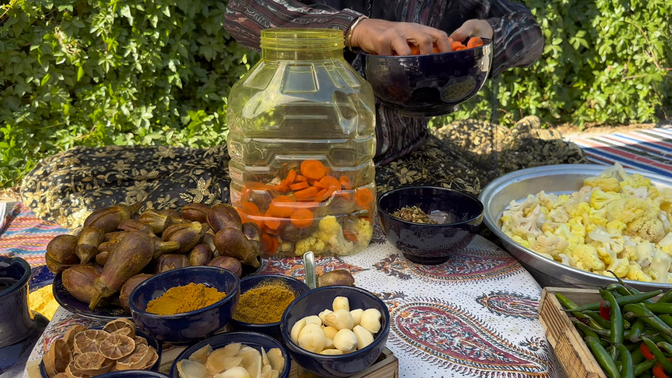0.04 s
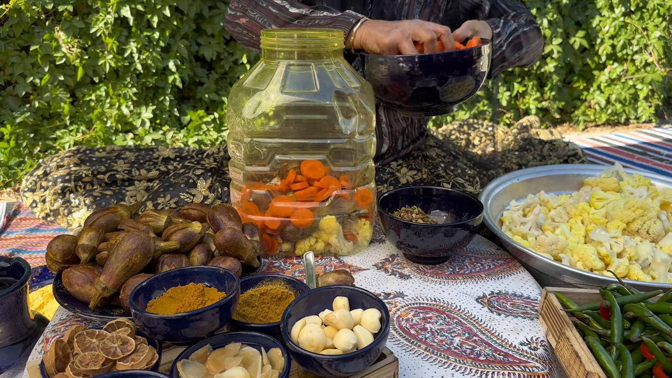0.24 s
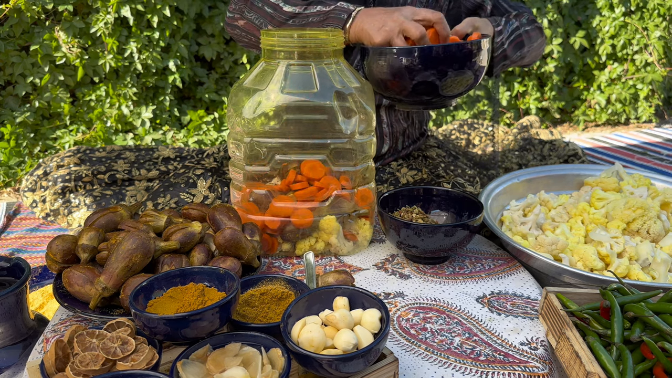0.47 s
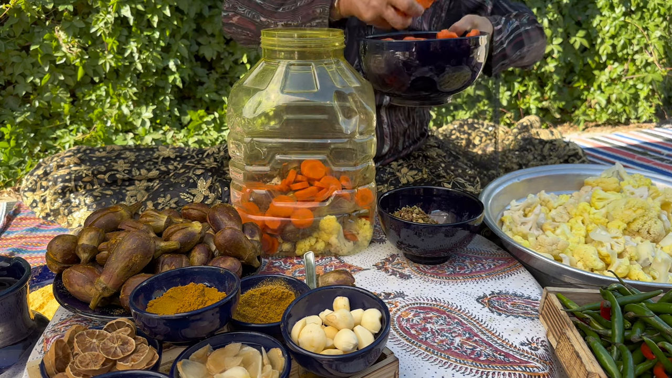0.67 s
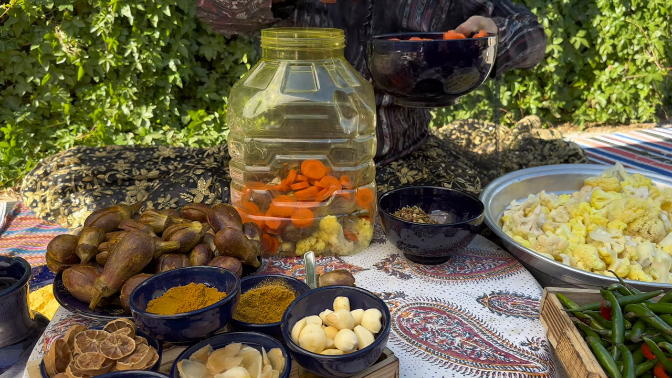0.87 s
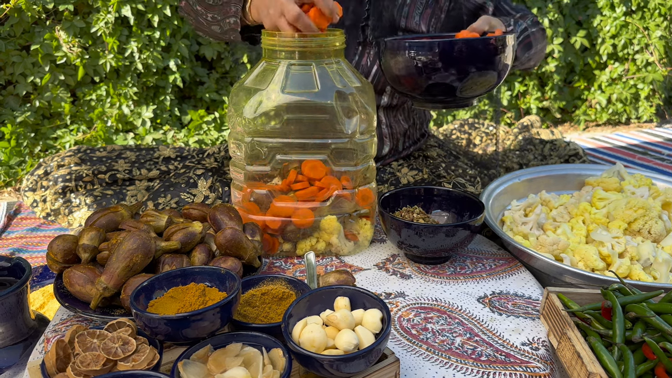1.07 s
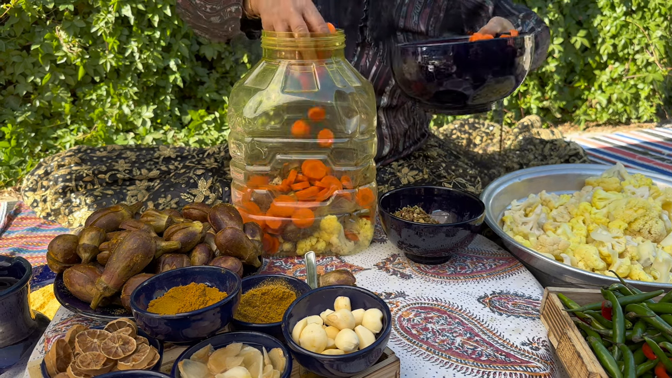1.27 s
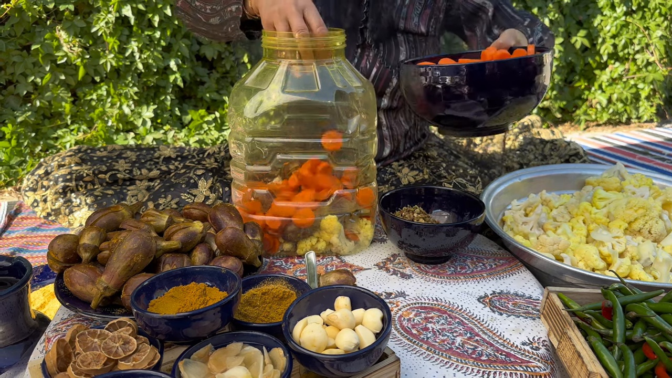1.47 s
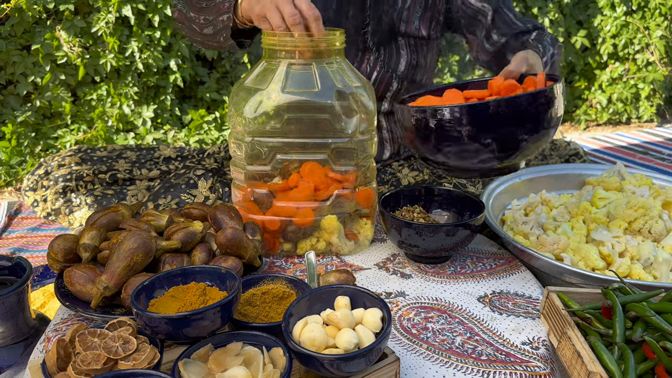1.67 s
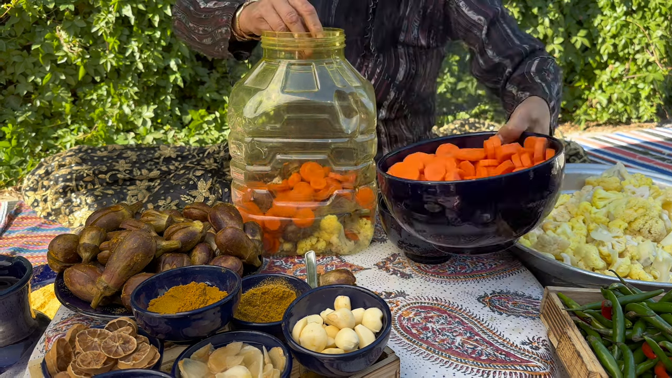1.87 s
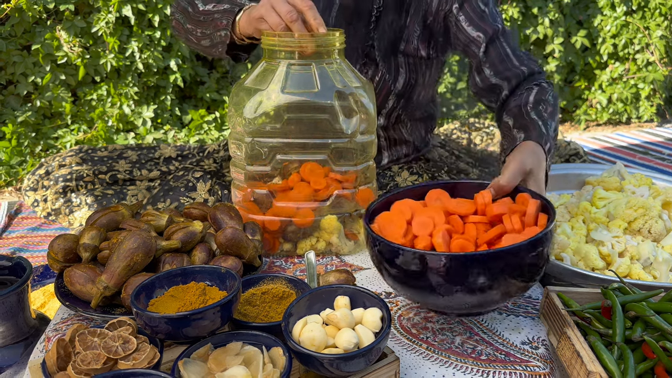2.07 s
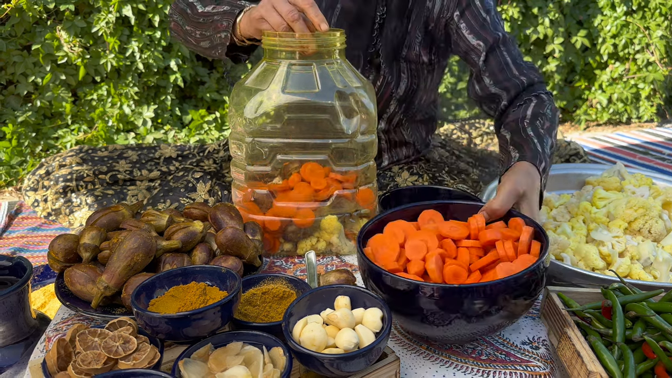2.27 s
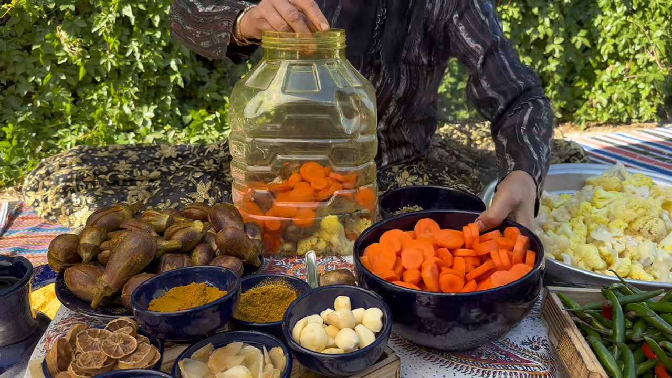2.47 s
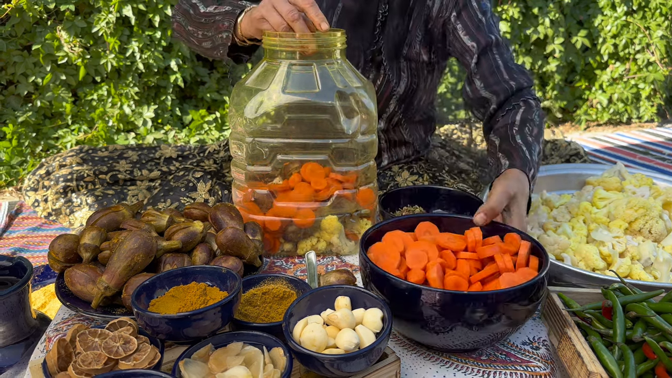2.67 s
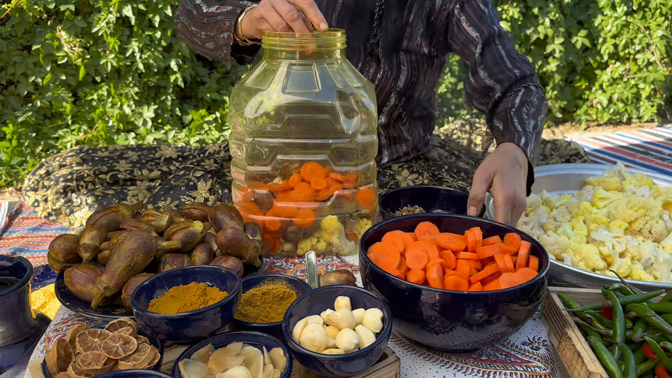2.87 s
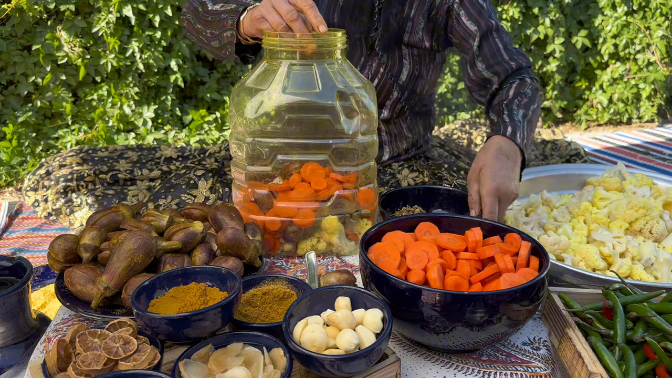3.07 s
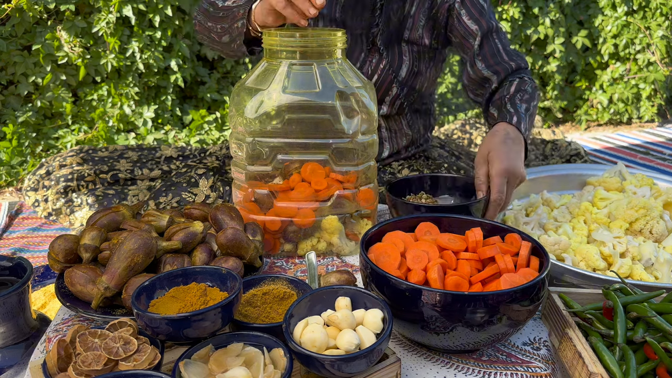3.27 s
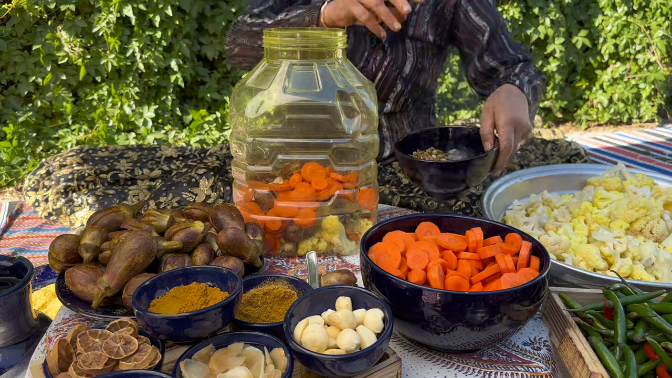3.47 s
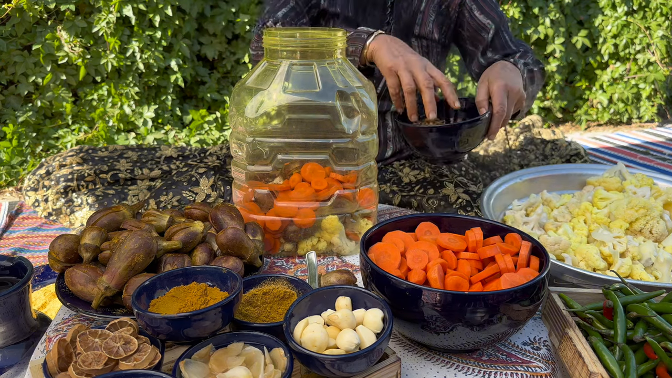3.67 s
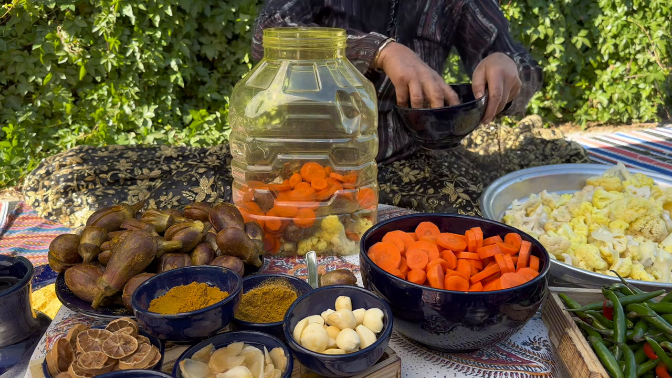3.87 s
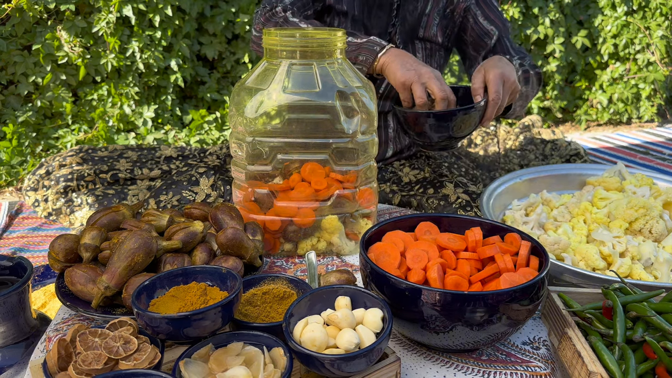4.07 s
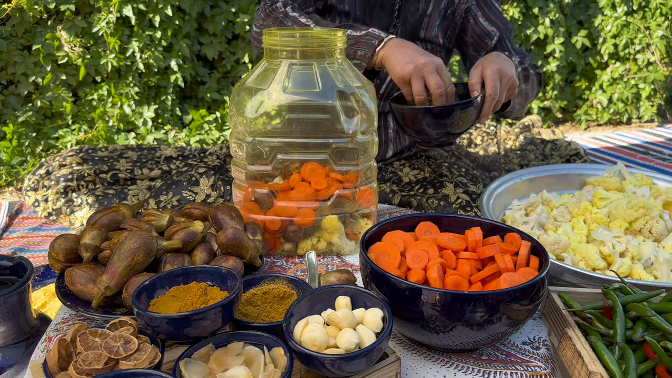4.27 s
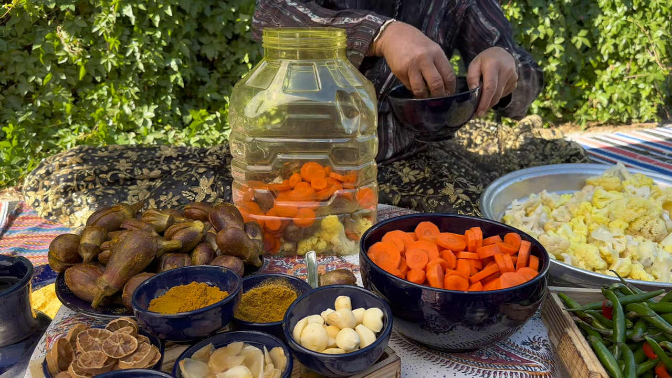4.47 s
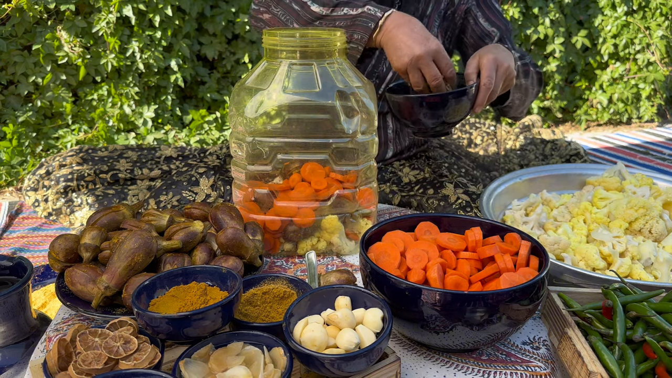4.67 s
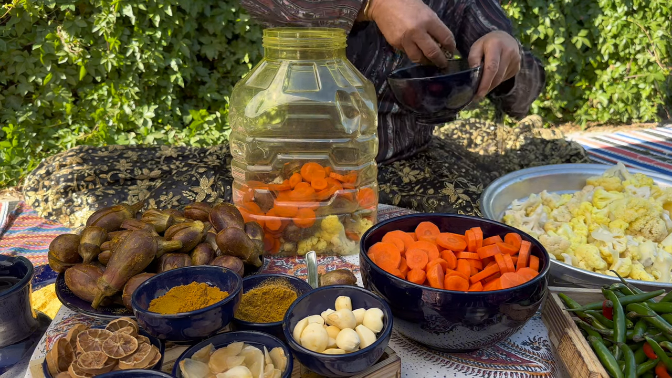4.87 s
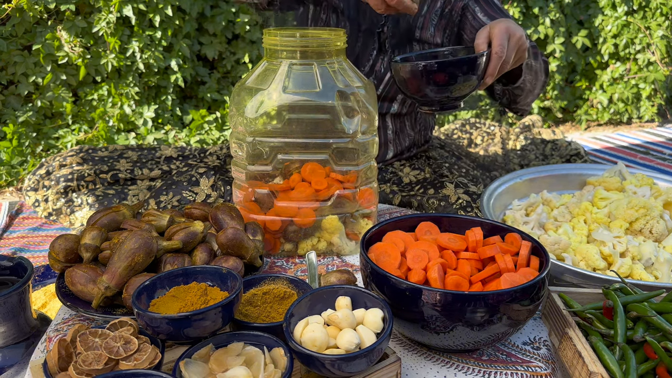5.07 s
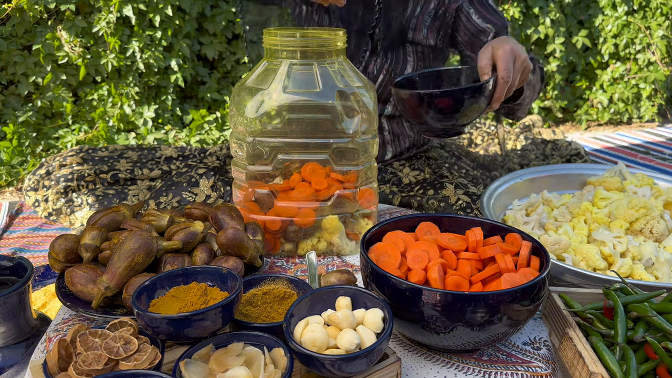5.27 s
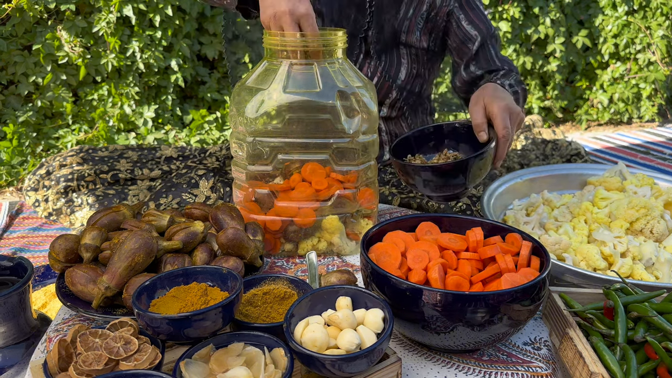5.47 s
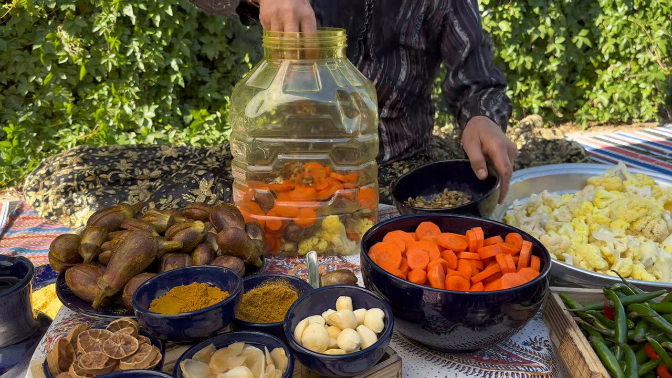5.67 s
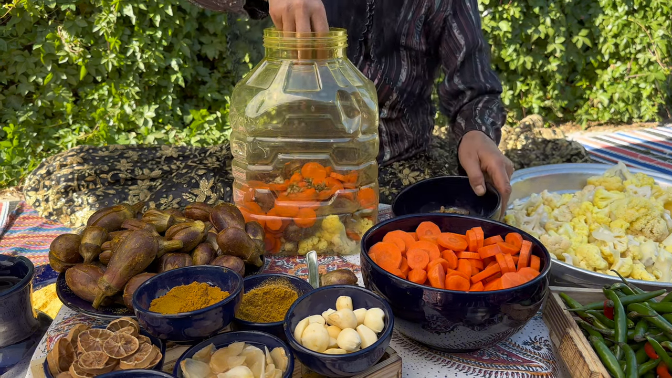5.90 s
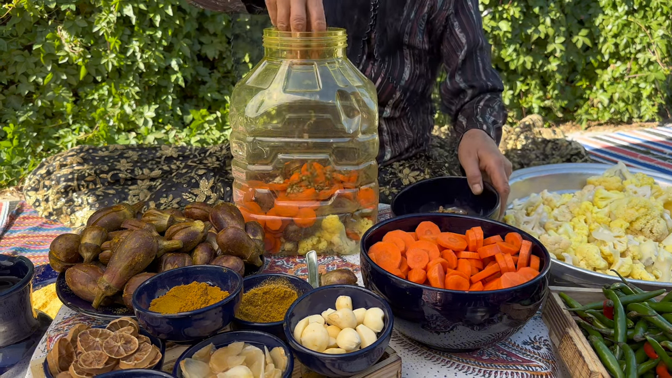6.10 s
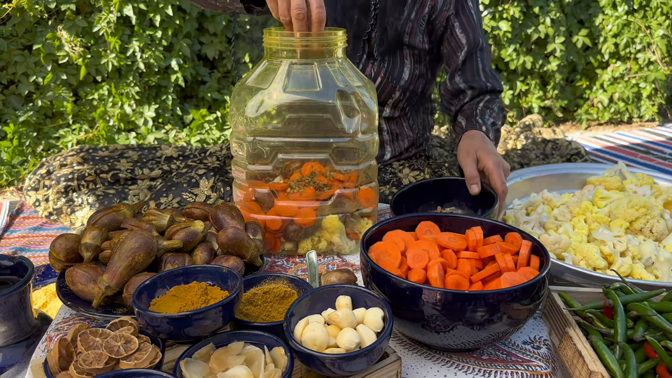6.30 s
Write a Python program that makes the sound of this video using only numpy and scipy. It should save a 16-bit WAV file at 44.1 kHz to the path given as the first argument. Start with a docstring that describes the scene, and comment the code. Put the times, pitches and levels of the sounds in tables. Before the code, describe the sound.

Outdoors among birdsong, vegetable pieces bonk into a large plastic jar, a heavy bowl is set down, then a handful of seeds rattles in.

```python
"""Carrot slices drop into a big plastic jar, two glazed bowls are set on a low table, and a handful
of seeds is scattered into the jar. Each blow rings a set of decaying sine waves and adds a noisy snap.
Rubbing is clumped noise. A songbird whistles and sparrows chirp across the yard as gliding tones.
Behind them are far traffic rumble and wash, made of shaped noise, and a wavering sine hum."""
import sys
import numpy as np
from scipy import signal
from scipy.io import wavfile
from scipy.ndimage import uniform_filter1d

SR = 44100
rng = np.random.default_rng(int(sys.argv[2]) if len(sys.argv) > 2 else 0)


def ratio(d):
    """dB to gain"""
    e = np.asarray(d, float) / 20
    return 10 ** e


def waveform_to_disk(signal):
    """Save audio, clipped to [-1, 1], as 16-bit WAV at the path in sys.argv[1]."""
    frames = np.transpose(np.atleast_2d(signal))
    scaled = np.clip(frames, -1, 1) * 32767
    samples = np.round(scaled).astype(np.int16)
    wavfile.write(sys.argv[1], SR, samples)


N = 279594  # length in samples

# ways the jar rings (modes): pitch_hz, relative_level_db, time_to_fall_60_db_s
JAR_MODES = [(97, 0.5, 0.79), (127, 2.5, 0.64), (211, 4, 0.19), (236.7, 5, 0.2), (323, 1.5, 0.15),
             (437, -2, 0.14), (474.6, -3, 0.15), (539, -3, 0.14), (599, 2.5, 0.12), (714, -4.5, 0.091),
             (828, -13.5, 0.16), (937, -0.5, 0.079), (1110, -9, 0.068), (1320, 1, 0.056),
             (1500, -2.5, 0.041), (1930, -3.5, 0.031), (2820, -6.5, 0.026), (3560, -6.5, 0.013),
             (3992, -20, 0.051)]


def evened(x):
    """Scales a sound to an average strength (rms) of 1."""
    return x / np.sqrt(np.mean(x ** 2) + 1e-20)


def slow(size, smooth_s):
    """Smooth random wander, rms 1: white noise averaged over a bell-shaped window."""
    window = np.hanning(round(smooth_s * SR))
    return evened(signal.oaconvolve(rng.standard_normal(size), window, "same"))


def read(points, hz):
    """Reads a curve of (Hz, value) points on a log-frequency axis."""
    f, value = np.transpose(points)
    return np.interp(np.log(hz + 1), np.log(f + 1), value)


def add(mix, s, sound):
    """Mixes a sound in at time s."""
    part = mix[:, round(s * SR):][:, :sound.shape[1]]
    part += sound[:, :part.shape[1]]


def noise(spectrum, size, patchy_db, lo_hz, hi_hz):
    """Two-channel noise from random short-time spectra with drifting patches; rms 1 in the band lo-hi."""
    # how alike left and right are: pitch_hz, likeness_0_to_1
    likeness = [(60, 1), (180, 0.86), (550, 0.14), (1650, 0.0054), (4970, 0.029), (15000, 0.85)]
    frames = 4 * N // size + 5
    hz = np.fft.rfftfreq(size, 1 / SR)
    a, b, c, d, patches = rng.standard_normal((frames, len(hz), 5)).T
    patches = uniform_filter1d(patches, size=5, axis=0)
    patches = evened(uniform_filter1d(patches, size=5, axis=1))
    same = np.clip(read(likeness, hz), -1, 1)[:, None]
    left = a + 1j * b
    right = same * left + np.sqrt(1 - same ** 2) * (c + 1j * d)
    z = np.array([left, right])
    z *= ratio(read(spectrum, hz)[:, None] + patchy_db * patches)
    power = (abs(z) ** 2).mean((0, 2))
    share = power[(hz >= lo_hz) & (hz <= hi_hz)].sum() / power.sum()
    sound = signal.istft(z, nperseg=size, noverlap=3 * size // 4)[1][:, :N]
    return evened(sound) / np.sqrt(share)


def rumble():
    """Lumpy, low, far traffic noise at a fixed average level."""
    # shape of the rumble: pitch_hz, relative_level_db_per_hz
    rumble_shape = [(12, -26), (20, -9.5), (27, -42.5), (48, 3), (102, -3), (141, -3), (190, -23),
                    (226, -10.5), (255, -21.5), (500, -41), (650, -33), (1100, -120)]
    return ratio(-55) * noise(rumble_shape, size=4096, patchy_db=2.5, lo_hz=40, hi_hz=324)


def wash():
    """Smoother traffic noise above the rumble, whose level ebbs and swells."""
    # shape of the wash: pitch_hz, relative_level_db_per_hz
    wash_shape = [(120, -38.5), (200, 6.5), (227, -10.5), (249, -19.5), (278, -6.5), (339, -9),
                  (607, -16.5), (1430, -21), (1880, -29.5), (8350, -40), (11800, -56), (13900, -43),
                  (15500, -80)]
    # level between 500 and 1700 Hz: time_s, level_db
    ebb = [(0, -70.5), (.75, -75), (2.5, -73.5), (4.3, -79), (6.34, -74.5)]
    level_db = np.interp(np.arange(N) / SR, *np.transpose(ebb))
    return ratio(level_db) * noise(wash_shape, size=1024, patchy_db=2.8, lo_hz=500, hi_hz=1700)


def hum():
    """A distant machine: one sine wave whose pitch and level wander slowly."""
    hum_hz, wander_hz, level_db, waver_db = 221.7, 1.25, -73.5, 5
    wander = np.cumsum(slow(N, 0.18)) / SR
    wave = np.sin(2 * np.pi * (hum_hz * np.arange(N) / SR + wander_hz * wander))
    return np.sqrt(2) * ratio(level_db + waver_db * slow(N, 0.29)) * wave


def yard(x, direct_db, wet_db):
    """Sparse echoes off walls and hedges, each band dying at its own speed."""
    # dying away of the echoes: pitch_hz, time_to_fall_60_db_s
    echo_decay = [(200, 0.96), (1900, 0.67), (3000, 0.84), (5000, 0.4), (9000, 0.97)]
    taps = np.zeros((2, SR))
    at = np.arange(400, SR - 20, 20) + rng.integers(0, 20, (2, (SR - 401) // 20))
    np.put_along_axis(taps, at, rng.choice([-1., 1.], at.shape), 1)
    taps[1] = 0.4 * taps[0] + 0.91 * taps[1]  # the two sides are partly alike
    hz, t, z = signal.stft(taps, SR, nperseg=256)
    tail = signal.istft(z * ratio(-60 * t / read(echo_decay, hz)[:, None]), SR, nperseg=256)[1]
    tail = tail / np.linalg.norm(tail[0])
    echoes = signal.fftconvolve(x, tail, axes=1)[:, :N]
    return ratio(direct_db) * x + ratio(wet_db) * echoes


def tone(hz, level_db, hoarse, second_db):
    """A whistled near-sine with a second partial; hoarseness shakes its pitch and level."""
    hz = hz * (1 + .08 * hoarse * slow(len(hz), .008))
    turns = 2 * np.pi * np.cumsum(hz) / SR
    # the throat favours overtones near 9.4 kHz
    overtone = ratio(second_db - abs(hz - 4700) / 50) * np.sin(2 * turns)
    shake_db = 9 * hoarse * slow(len(hz), 0.0046)
    soft_ends = signal.windows.tukey(len(hz), .2)
    return np.sqrt(2) * ratio(level_db + shake_db) * (np.sin(turns) + overtone) * soft_ends


def sparrows():
    """Falling chirps with a fast ragged warble, far enough off to be mostly echo."""
    # before swell, warble and echo: start_s, level_db, start_pitch_hz, end_pitch_hz
    chirps = [(0.35, -70, 5100, 3960), (1.976, -71.5, 5060, 3770), (2.982, -71, 5120, 3210),
              (3.604, -69.5, 5420, 3330), (3.926, -80.5, 4530, 3000), (4.134, -78, 3890, 2640),
              (4.49, -72, 5410, 2940), (5.125, -69.5, 5470, 2890), (5.297, -77.5, 4010, 2700),
              (5.622, -76.5, 4860, 3300), (5.874, -70, 4900, 3790)]
    shortest_s, fall_hz_per_s = 0.028, 22000  # a deeper fall makes a longer chirp
    warble_share, warble_hz = 0.17, 519  # pitch swing as a share, swings a second
    out = np.zeros((2, N))
    for s, level_db, start_hz, end_hz in chirps:
        length = shortest_s + (start_hz - end_hz) / fall_hz_per_s
        u = np.arange(round(length * SR)) / (length * SR)  # 0 to 1 along the chirp
        swing = np.sin(2 * np.pi * (warble_hz * length * u + rng.random()))
        warble = 1 + warble_share * swing + 0.017 * slow(len(u), .02)
        swell_db = 14 * np.sin(np.pi * u ** 1.18) - 8
        falling_hz = start_hz + (end_hz - start_hz) * u
        chirp = tone(falling_hz * warble, level_db + swell_db, hoarse=.3, second_db=-40)
        add(out, s, chirp[None])
    return yard(out * ratio([[.9], [-.9]]), direct_db=-6.5, wet_db=-1.5)


def columns(rows):
    """Start time and the values of a curve at every sample, joined by lines."""
    s, value = np.transpose(rows)
    return s[0], np.interp(np.arange(s[0], s[-1], 1 / SR), s, value)


def songbird():
    """Gliding whistles and fainter notes of other birds, with one clear wall echo and the yard's echoes."""
    # songbird, before hoarseness and echo: peak_level_db, hoarseness_0_to_1, pitch curve of (time_s, pitch_hz)
    whistles = [ (-81.5, 0.25, [(2.75, 2066), (2.87, 2120)]), (-59.5, 0.041, [(2.895, 1807), (2.945, 1960),
                (2.99, 1976), (3.04, 1937), (3.125, 1762)]), (-74, 0.34, [(3.215, 3000), (3.255, 1860)]),
                (-64, 0.19, [(3.28, 1980), (3.305, 2750), (3.385, 2210)]), (-63, 0.14, [(3.505, 2108),
                (3.56, 2083), (3.59, 1560)]), (-68, 0.33, [(3.66, 2480), (3.7, 2490), (3.76, 2404)]),
                (-64.5, 0.27, [(3.76, 2492), (3.83, 2066), (3.9, 2570), (3.96, 2564)]),
                (-79, 0.24, [(3.98, 2250), (4.02, 2910), (4.045, 2700)]), (-60.5, 0.27, [(4.05, 1860),
                (4.11, 1980), (4.17, 1872)]), (-78.5, 0.41, [(4.43, 2630), (4.465, 2820)]),
                (-66, 0.29, [(4.472, 1820), (4.53, 2010), (4.58, 1815)]), (-73.5, 0.48, [(4.92, 1700),
                (4.95, 1974), (4.985, 2490)]), (-62.5, 0.26, [(4.99, 2670), (5.03, 1948), (5.21, 1959)]), ]
    # fainter notes of other birds, same columns
    faint_notes = [(-78, 0.22, [(4.18, 4745), (4.27, 4534)]), (-100.5, 1, [(5.42, 9000), (5.5, 8000),
                   (5.58, 7800)]), (-84, 0.48, [(5.585, 7500), (5.62, 6570), (5.66, 6270)]),
                   (-84, 0.32, [(3.49, 2800), (3.52, 3010), (3.55, 3040)])]
    top, start_db, end_db = 0.6, -5, -14.5  # a note swells to its peak at this share of its length, then sinks
    out = np.zeros((2, N))
    for peak_db, hoarse, pitch in whistles + faint_notes:
        s, hz = columns(pitch)
        u = np.linspace(0, 1, len(hz))
        swelling_db = start_db * (1 - u / top) ** 2
        sinking_db = end_db * ((u - top) / (1 - top)) ** 2
        swell_db = np.where(u < top, swelling_db, sinking_db)
        note = tone(hz, peak_db + swell_db, np.clip(hoarse, 0, 1), second_db=-12.5)
        add(out, s, note[None])
    wall_s = 0.095
    echo = np.pad(out, ((0, 0), (round(wall_s * SR), 0)))[:, :N] * ratio([[-20.0], [-16.0]])
    return yard((out + echo) * ratio([[.7], [-.7]]), direct_db=5.0, wet_db=2.2)


def rustle():
    """Friction noise, gently clumped by tiny grains; each rub swells quickly and dies away."""
    # hands and loose bits rubbing on the jar: start_s, length_s, level_db (before swell and fade)
    rubs = [(0.263, 0.13, -85), (1.095, 0.13, -69.5), (1.3, .04, -70), (1.385, 0.1, -69),
            (1.55, 0.049, -90), (2.56, 0.11, -81), (3.21, 0.065, -75), (3.902, 0.39, -79.5),
            (5.487, 0.062, -80.5), (5.617, 0.34, -74), (6.034, .28, -69)]
    # shape of the rubbing noise: pitch_hz, relative_level_db_per_hz
    rub_shape = [(150, -20.5), (300, -7), (650, -1.5), (1200, -5), (2000, -10.5), (4500, -19.5),
                 (6500, -27.5), (9000, -26), (11000, -38), (15000, -48)]
    rise, lift, fade_db = 0.078, 0.26, -5.5  # shares spent swelling and lifting off; fade on the way
    level = np.zeros((2, N))
    for s, length, level_db in rubs:
        u = np.linspace(0, 1, round(length * SR))
        ends = np.minimum(u / rise, 1) * np.minimum((1 - u) / lift, 1)
        add(level, s, (ratio(level_db + fade_db * u) * ends)[None])
    grains = ratio(1.5 * rng.exponential(1, N)) * (rng.random(N) < 600 / SR)  # about 600 a second
    fading_grains = signal.lfilter([1], [1, -np.exp(-1 / (.005 * SR))], grains)
    clumps = evened(1.5 + fading_grains)
    return level * clumps * noise(rub_shape, size=512, patchy_db=4.0, lo_hz=3000, hi_hz=9000)


def blows(events, modes, crack_db, dull_db, rise_s, under_db, crack_s, apart, dense_db, spot_db, pan_db,
          skid, size):
    """Each blow rings the modes near its own pitch most, plus many small short wall modes, and snaps at the contact.
    crack_db (snap) and dull_db (loss per octave above the blow's pitch) go from softest to hardest;
    under_db is the loss per octave below, rise_s the rise time at 500 Hz, apart the phase spread (rad) at 1 kHz."""
    main_hz, main_db, main_t60 = np.transpose(modes)
    t = np.arange(size) / SR
    out = np.zeros((2, N))
    bright = signal.butter(2, [2500, 10500], "bandpass", fs=SR, output="sos")
    for s, peak_db, centre_hz, hard in events:
        hard = np.clip(hard, 0, 1)
        small_hz = np.exp(rng.uniform(np.log(250), np.log(1.355 * main_hz[-1]), size=56))
        hz = np.r_[main_hz, small_hz][:, None]
        db = np.r_[main_db, dense_db + np.interp(small_hz, main_hz, main_db)][:, None]
        t60 = np.r_[main_t60, .6 * np.interp(small_hz, main_hz, main_t60)][:, None]
        spot, lag = rng.standard_normal((2, len(hz), 1))
        octaves = np.log2(hz / centre_hz)
        loss_above = np.interp(hard, [0, 1], dull_db) * octaves
        db = db - np.where(octaves > 0, loss_above, -under_db * octaves)
        # where it lands colours the upper modes
        db = db + spot_db * spot * np.clip(np.log2(hz / 300), 0, 1)
        # high modes reach the two microphone ports unalike
        lag = apart * lag * np.sqrt(hz / 1000) * np.array([1, -1])[:, None, None]
        rise = (1 - np.exp(-t * hz / (500 * rise_s))) ** 2  # treble speaks first
        waves = np.sin(2 * np.pi * hz * t + lag)
        ring = (ratio(db - 60 * t / t60) * rise * waves).sum(1)
        # it skids and rattles for a moment
        bounces = skid * rng.standard_normal(700) * (rng.random(700) < .03) * np.exp(-t[:700] / 0.0092)
        ring = signal.oaconvolve(ring, np.r_[1, bounces][None], axes=1)[:, :size]
        snap = signal.sosfilt(bright, rng.standard_normal((len(t), 3)).T)
        snap = (snap[0] + 1.8 * snap[1:]) * np.exp(-t / crack_s)  # one shared part, one part for each side
        snap_level = ratio(np.interp(hard ** 4, [0, 1], crack_db))
        blow = (ring / abs(ring).max() + snap_level * snap) * np.sqrt(1 - t / t[-1])
        add(out, s, ratio(peak_db + pan_db * np.array([[.5], [-.5]])) * blow)
    return out


# In every blow table below, level_db is the ring's peak before its closing fade, panning, muffling and echo.


def small_bowl_tings():
    """The small bowl rings in a few long modes when touched."""
    # start_s, level_db, strongest_pitch_hz, hardness_0_to_1
    tings = [(.213, -58, 1455, 0.54), (2.626, -49.5, 1455, 1)]
    # small bowl modes: pitch_hz, relative_level_db, time_to_fall_60_db_s
    small_bowl_modes = [(1140, -9, 0.053), (1455, -4.5, 0.14), (2400, -11, 0.093), (3720, -9.5, 0.057),
                        (5120, -13.5, 0.064)]
    return blows(tings, small_bowl_modes, crack_db=(-40, -16), dull_db=(3, 3), rise_s=0.00069, under_db=7,
                 crack_s=0.003, apart=0.15, dense_db=-20, spot_db=.8, pan_db=3.0, skid=0.08, size=9000)


def clinks_and_ticks():
    """The full bowl clinks briefly with damped ringing; a few dry, high ticks follow."""
    # start_s, level_db, strongest_pitch_hz, hardness_0_to_1
    clinks = [(2.373, -27, 980, .9), (2.445, -47, 1030, 0.62), (2.472, -48.5, 1130, .75),
              (2.499, -52, 1080, 0.81), (2.545, -70, 3480, 0.042), (2.579, -43.5, 690, 0.21),
              (2.779, -53, 4530, 0.93), (4.944, -62.5, 8800, 0.97), (4.98, -67, 8800, .8)]
    # full bowl modes, also used for the ticks: pitch_hz, relative_level_db, time_to_fall_60_db_s
    bowl_modes = [(616, -9, 0.049), (851, 0, 0.047), (972, -1, 0.046), (1180, 5, 0.022), (1455, -18, 0.13),
                  (2490, -2, 0.048), (2800, -9, 0.013), (3480, -7, 0.059), (4900, -13, 0.025),
                  (5650, -16, 0.025), (8800, -25, 0.034)]
    return blows(clinks, bowl_modes, crack_db=(-55, -1.5), dull_db=(12, -.8), rise_s=0.00048,
                 under_db=28.0, crack_s=0.0037, apart=0.36, dense_db=-3.5, spot_db=2.5, pan_db=3.5,
                 skid=0.47, size=7000)


def table_thuds():
    """Setting things down rings the table's low, short modes with hardly any snap."""
    # start_s, level_db, strongest_pitch_hz, hardness_0_to_1
    set_downs = [(2.367, -20, 177, 0.99), (2.463, -42.5, 128, 0.58), (2.597, -35, 173, .9),
                 (2.625, -48, 101.4, 0.38), (5.803, -14, 270, .02), (5.813, -18.5, 110, 0.77)]
    # table modes: pitch_hz, relative_level_db, time_to_fall_60_db_s
    table_modes = [(101.7, -0.5, 0.22), (129.1, 14.5, 0.07), (172, 19.5, 0.042), (265, -0.5, 0.07),
                   (276, 3, 0.039), (612, -21, 0.047), (674, -19, 0.035)]
    return blows(set_downs, table_modes, crack_db=(-75, -52), dull_db=(7.5, 2.8), rise_s=0.0016,
                 under_db=12.5, crack_s=0.0067, apart=0.15, dense_db=-15.5, spot_db=8.5, pan_db=0.5,
                 skid=.05, size=11000)


def patter(count):
    """Blow rows for the many lesser seeds, each of its own size, pitch and hardness."""
    # lesser seeds landing at random: first_s, last_s, lowest_level_db
    patter_range = (5.95, 6.31, -54)
    first, last, lowest_db = patter_range
    when, big, pitch, hard = rng.random((count, 4)).T
    start_s = first + (last - first) * when ** .8
    return np.c_[start_s, lowest_db - 4 * np.log(big), 550 * 4.5 ** pitch, .35 + .35 * hard]


def scattered_seeds():
    """Light seeds strike the jar with short rings and quick snaps."""
    # clearest seeds: start_s, level_db, strongest_pitch_hz, hardness_0_to_1
    seeds = [(5.894, -44.5, 530, 0.31), (5.936, -48, 710, 0.57), (5.957, -37.5, 1170, 0.12),
             (5.984, -33.5, 1500, 0.046), (6.019, -41, 844, .15), (6.038, -35, 1320, 0.26),
             (6.073, -28.5, 1540, 0.89), (6.102, -40, 584, 0.93), (6.126, -33, 710, 0.8),
             (6.168, -40, 875, 0.65), (6.184, -40, 1310, 0.38), (6.199, -32.5, 940, 0.89),
             (6.222, -31, 650, 0.31), (6.249, -34.5, 890, 0.51), (6.255, -36, 676, 0.74),
             (6.281, -36, 696, 0.22), (6.334, -26, 2550, 0.89)]
    return blows(np.r_[seeds, patter(count=40)], JAR_MODES, crack_db=(-28, -6), dull_db=(6.5, .3),
                 rise_s=0.0016, under_db=9.0, crack_s=0.0012, apart=0.28, dense_db=1.5, spot_db=2.0,
                 pan_db=1.2, skid=0.37, size=3200)


def carrot_slices():
    """Carrot slices strike the jar and make its plastic walls ring."""
    # start_s, level_db, strongest_pitch_hz, hardness_0_to_1
    slices = [(0.078, -42, 323, 0.69), (1.056, -34.5, 329, 0), (1.106, -31.5, 556, 0.2),
              (1.223, -47, 253, 0.66), (1.259, -33.5, 390, 0.1), (1.306, -25, 550, 0.03),
              (1.312, -23.5, 397, 0), (1.323, -20, 205, 0.43), (1.389, -36, 390, 0.4),
              (1.422, -17.5, 590, 0.7), (1.426, -14.5, 284, .6), (1.486, -28.5, 304, 0.43),
              (1.526, -33.5, 312, 0.95), (1.575, -50, 2580, 1), (1.64, -30, 600, 0.47),
              (1.765, -38.5, 248, 0.56), (3.219, -49, 571, 0.5)]
    return blows(slices, JAR_MODES, crack_db=(-54, -12), dull_db=(14.5, -.7), rise_s=0.00095, under_db=7,
                 crack_s=0.0033, apart=0.29, dense_db=-3, spot_db=4.5, pan_db=2.0, skid=0.22, size=11000)


def muffle(near):
    """Takes the top treble off the near sounds with a smooth filter."""
    # microphone response to the near sounds: pitch_hz, level_change_db
    mic_response = [(20, 0), (9500, 0), (10800, -12), (12000, -14), (14000, -10), (16000, -18)]
    hz = np.linspace(0, SR / 2, 257)
    taps = signal.firwin2(255, hz, ratio(read(mic_response, hz)), fs=SR)
    return signal.oaconvolve(near, taps[None], "same")


def scene():
    """Near blows and rubbing with a little echo, birds, and the background."""
    background = rumble() + wash() + hum()
    birds = sparrows() + songbird()
    bowls_and_table = small_bowl_tings() + clinks_and_ticks() + table_thuds()
    near = rustle() + bowls_and_table + scattered_seeds() + carrot_slices()
    return background + birds + yard(muffle(near), direct_db=-0.5, wet_db=-18.5)


def roll_off(x):
    """The treble ends steeply here."""
    return signal.sosfilt(signal.butter(12, 15960, fs=SR, output="sos"), x)


def record(dry):
    """The microphone loses the deepest bass, below about 30 Hz."""
    bass_cut = signal.butter(2, 30, "highpass", fs=SR, output="sos")
    mix = signal.sosfilt(bass_cut, dry)
    return roll_off(mix)


dry = scene()
out = record(dry)
waveform_to_disk(out)
```